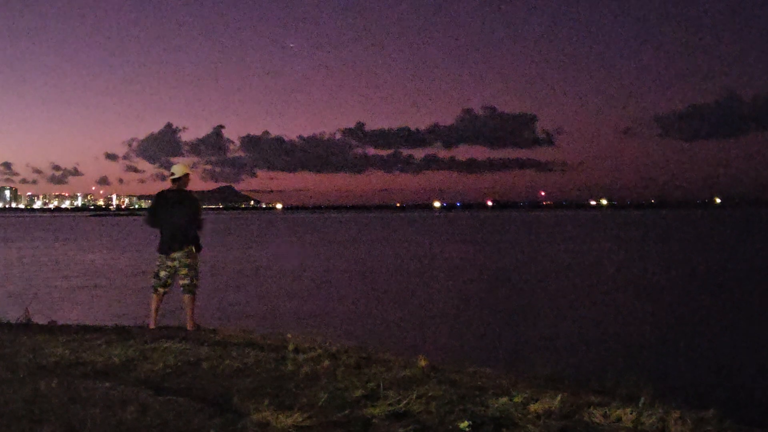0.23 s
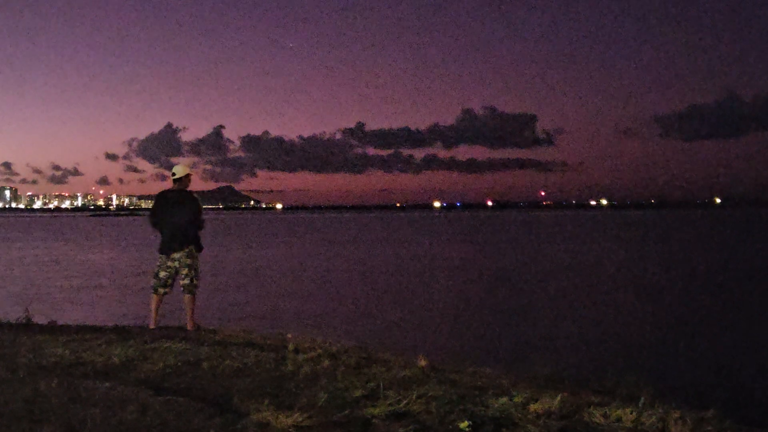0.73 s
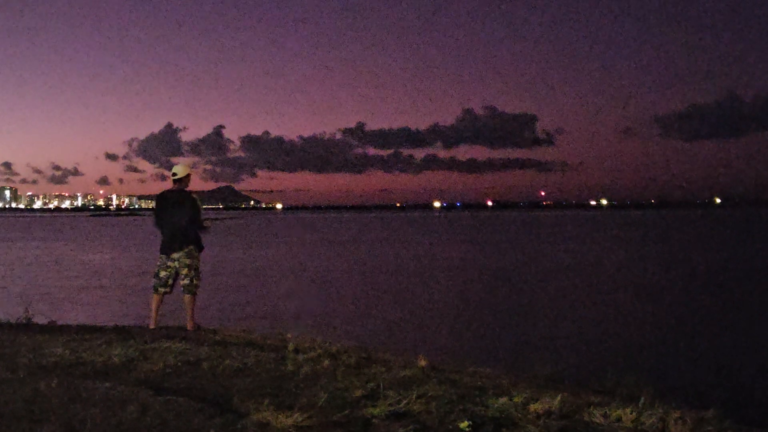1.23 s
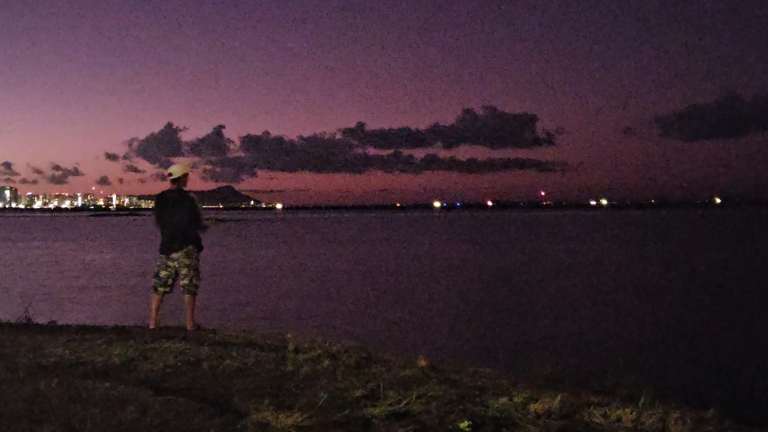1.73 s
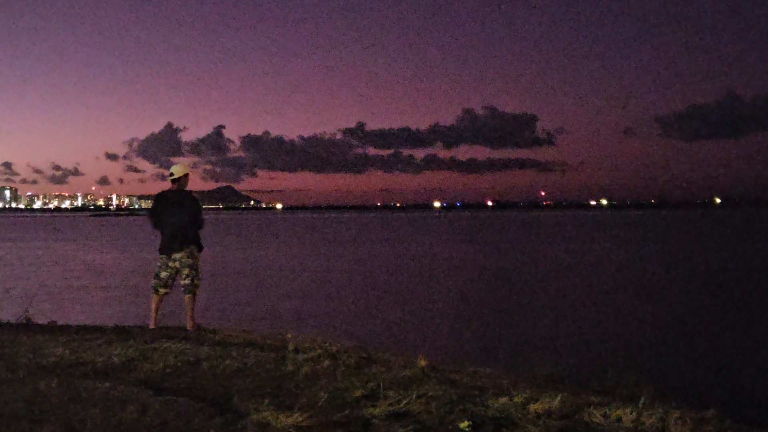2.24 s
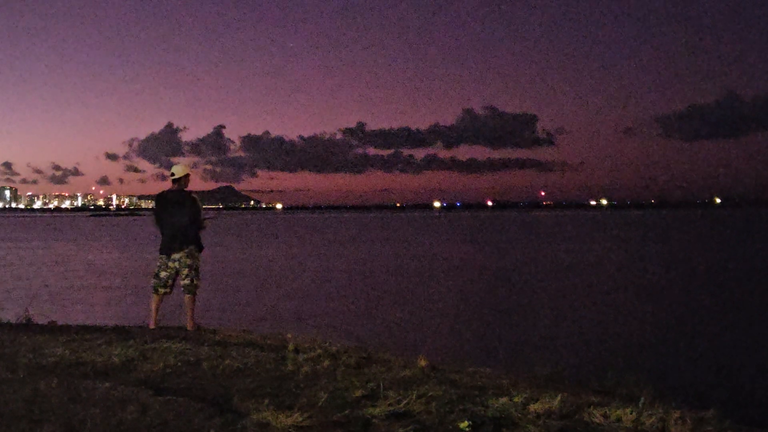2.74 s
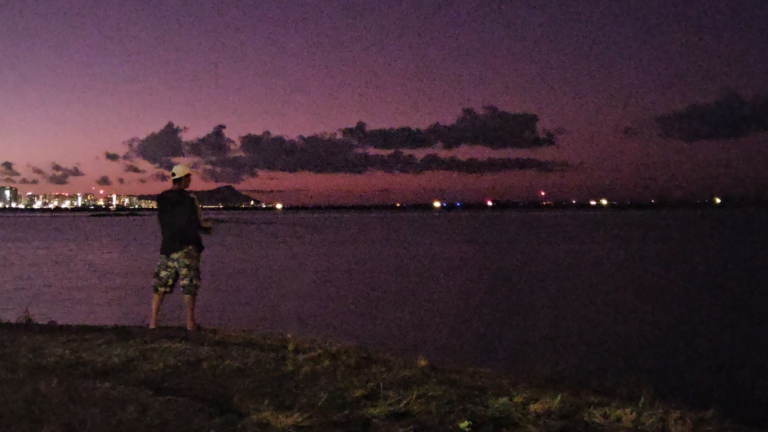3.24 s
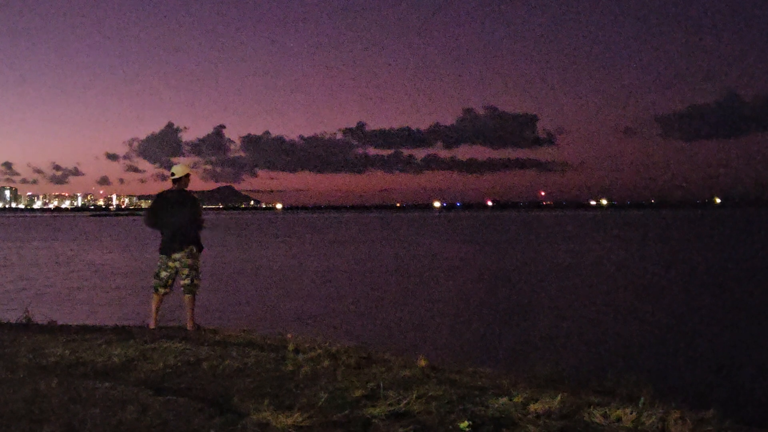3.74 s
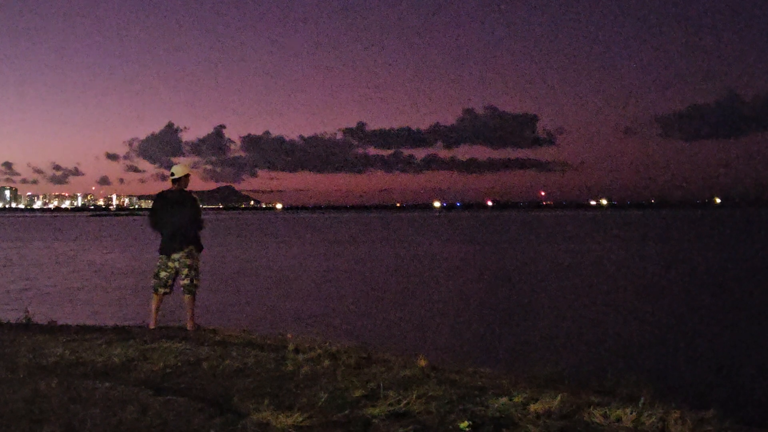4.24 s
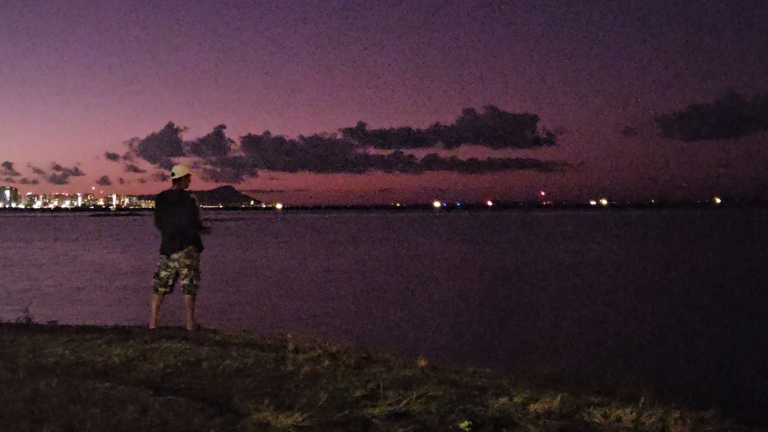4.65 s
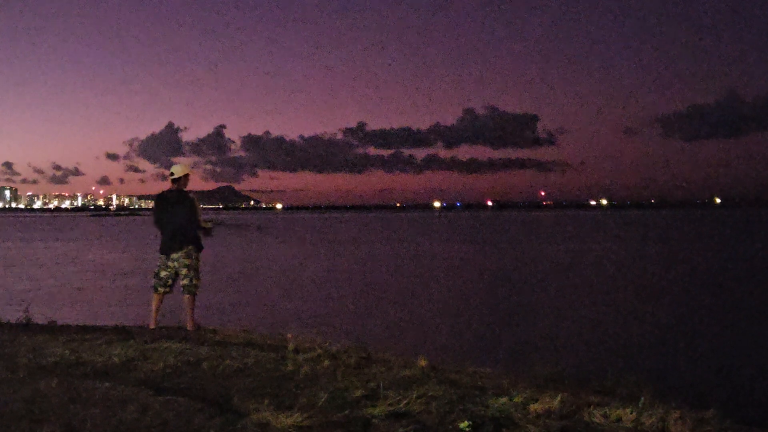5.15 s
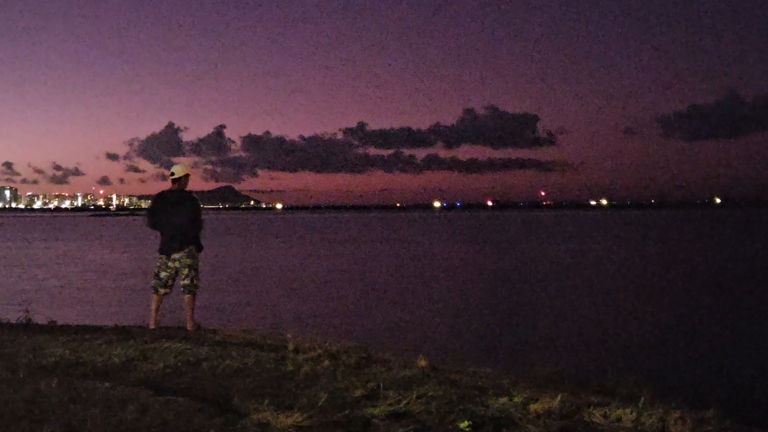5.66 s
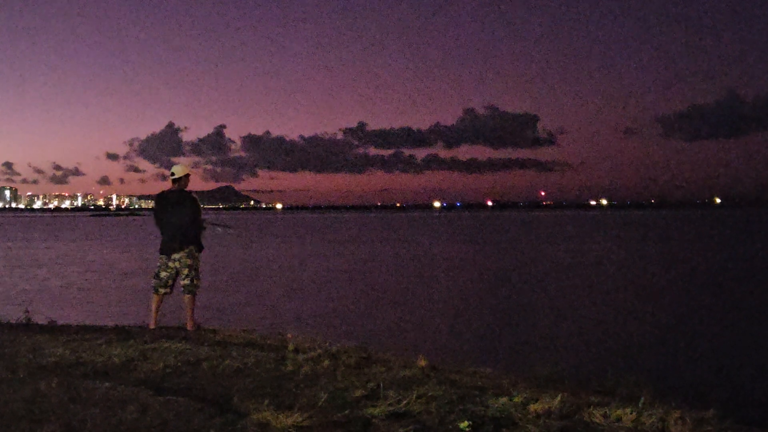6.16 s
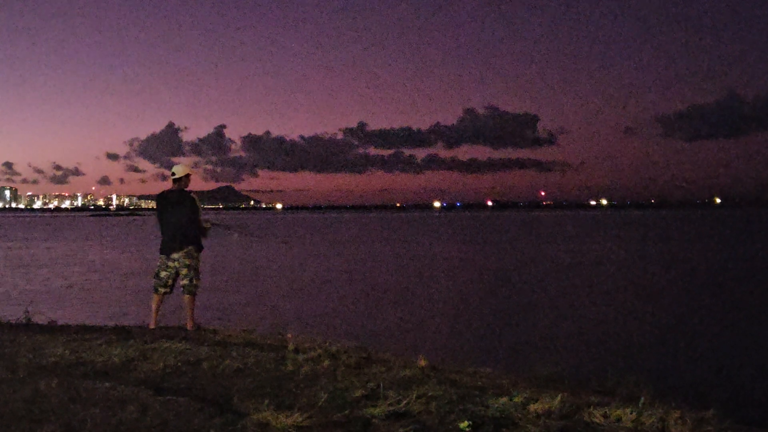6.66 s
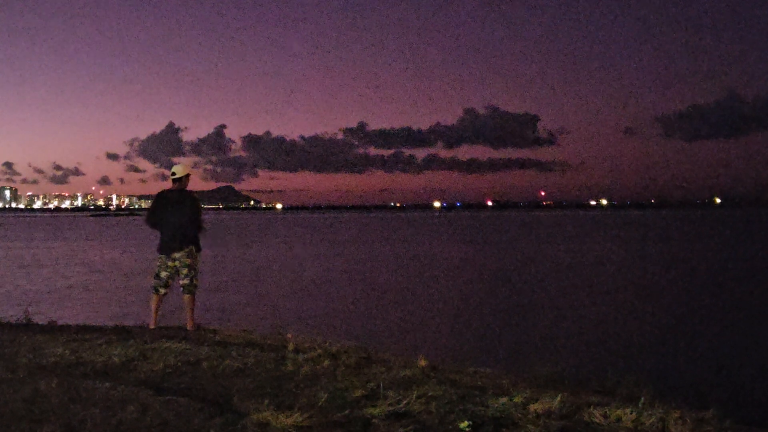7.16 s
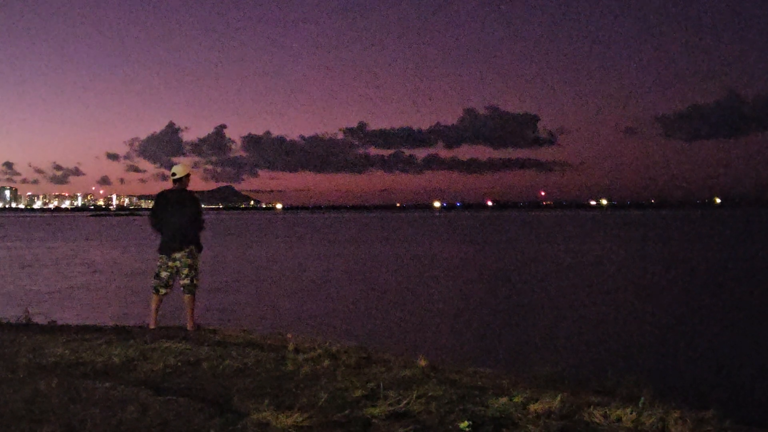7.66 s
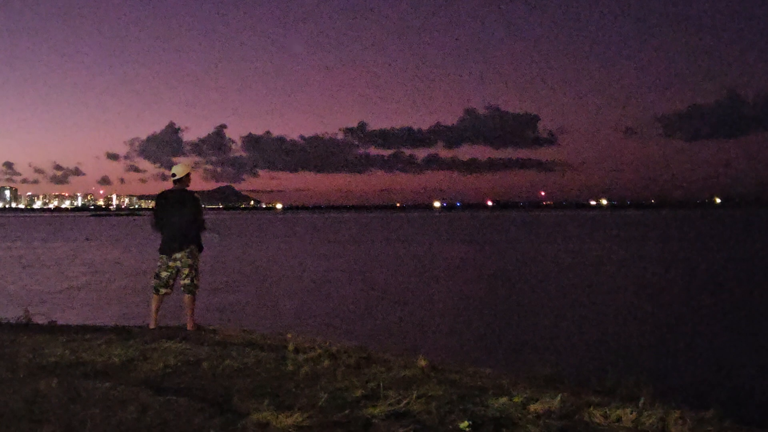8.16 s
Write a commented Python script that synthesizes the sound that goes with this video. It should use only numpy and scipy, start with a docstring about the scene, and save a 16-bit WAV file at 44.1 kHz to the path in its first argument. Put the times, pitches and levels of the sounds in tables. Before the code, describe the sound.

Outdoors on an open, quiet shore, little waves slap stones close by, with fizzing foam, popping bubbles and sharp drips. A low distant city rumble lies beneath. A jet airliner flies in: a faint roar grows from about three seconds, then surges in gusts, with a thin wavering fan whine sinking in pitch. By the end it is loud and nearly covers the water. Stereo handheld phone pickup, no room echo.

```python
"""A jet airliner flies low over a quiet shore: bands of shaped noise build its exhaust rumble and roar in gusts
and comb with a ground echo, while a wavering blade tone, the fan whine, sinks in pitch as the jet passes.
Bands of noise that follow the blade tone make the intake's rush. In front, wavelets slap, fizz and tick on
the stones: noise bursts, showers of tiny bubbles, ringing air pockets and drops.
A distant city rumbles below as wide, dark noise. A phone with two spaced ports hears it all."""
import sys
import numpy as np
from scipy import signal
from scipy.fft import rfft, irfft, next_fast_len
from scipy.io import wavfile
from scipy.ndimage import map_coordinates

SR = 44100
rng = np.random.default_rng(int(sys.argv[2]) if len(sys.argv) > 2 else 0)


def materialize(psi):
    """Save the field psi as 16-bit PCM at rate SR to the path in sys.argv[1].

    A 1-D psi becomes a single channel; in a 2-D psi each row is a channel.
    """
    bounded = np.clip(np.atleast_2d(psi).T, -1, 1)
    quanta = np.round(bounded * 32767).astype(np.int16)
    wavfile.write(sys.argv[1], SR, quanta)


N = 370881
TIME = np.arange(N) / SR  # s
SIZE = next_fast_len(N + 4096, real=True)  # filter length with spare room at the end
FREQ = np.maximum(np.arange(SIZE // 2 + 1) * SR / SIZE, 1)  # Hz

# the jet's pass before gusts and swells; noise levels are relative to its spectrum:
# [t/s, rumble level/dB, roar level/dB, hiss level/dB, fan whine level/dB]
JET_PASS = [(0, -23.5, -19, -26, -64), (1.2, -24, -18, -27.5, -63), (1.7, -24.5, -17.5, -24.5, -54),
            (2.9, -13.5, -15, -21.5, -58.5), (3.7, -11, -16.5, -18, -58.5), (4.2, -5.5, -7.5, -12.5, -53.5),
            (4.75, -6.5, -5, -10.5, -51), (5.3, -1.5, 2, -7, -49.5), (5.85, 1, -2, -5, -48),
            (6.45, 2, 1.5, -2.5, -46), (6.95, -2, 1.6, -3, -46.5), (7.5, 1.2, 2.5, -3, -48),
            (8.41, 1.5, 4, -3.5, -44.5)]
# spectrum of the jet noise: [f/Hz, density/dB per Hz]
JET_SPECTRUM = [(22, -57), (36, -43.5), (70, -39), (125, -41), (210, -50), (350, -57), (520, -57.5),
                (780, -62.5), (1000, -62.5), (1350, -62), (2000, -67.5), (2900, -71.5), (4500, -80.5),
                (5600, -90.5), (7000, -110), (10000, -129), (16000, -135)]
# gusts of turbulent air that focus the sound on the shore or bend it away, before each part takes its share:
# [t/s at the crest, half-width/s to 1/e, lift/dB]
GUSTS = [(4.58, 0.11, 1.5), (5.08, 0.056, -2.5), (5.36, 0.2, 5.5), (6.25, 0.14, 8.5), (7.0, 0.1, 2),
         (7.41, 0.06, 4), (7.99, 0.18, 6.5)]
# share of a gust's lift taken by each part of the jet noise: {part: share, no unit}
GUST_SHARE = {"rumble": 0.16, "roar": 0.49, "hiss": 0.92}
# jet sound scattered by eddies, arriving from all round: [f/Hz, level/dB relative to the direct sound]
SCATTER_COLOUR = [(100, -15), (950, -19), (2000, -11), (2800, -13), (4000, -8), (7000, 0)]
# ground echo of the jet: [t/s, lag/ms, strength/0-1]
GROUND_ECHO = [(0, 1.57, 0.25), (4.0, 1.15, 0.2), (5.2, 1.8, 0.04), (6.25, 1.64, 0.22), (6.65, 1.23, 0.31),
               (7.05, 1.585, 0.7), (8.41, 2.37, 0.39)]
# lag of the left port behind the right for the jet: [t/s, lag/ms]
JET_PORT_LAG = [(0, .555), (4.5, .54), (7.1, .522), (8.41, .495)]
# the fan whine swells and fades on its own: [t/s at the crest, half-width/s to 1/e, lift/dB]
FAN_SWELLS = [(1.05, 0.11, 5), (2.35, 0.13, -3.5), (2.9, 0.067, 6), (3.3, 0.092, 4.5), (3.88, 0.1, 6),
              (5.21, 0.048, 8), (5.36, 0.15, 7.5), (6.22, 0.089, 14), (6.5, 0.13, 4), (7.26, 0.11, 6),
              (7.94, 0.082, 8)]
# rushing bands of the engine intake, before its approach level: [multiple of blade tone, half-width/Hz, level/dB]
INTAKE_BANDS = [(1.45, 548, -69), (2.16, 200, -78.5)]
# the intake beams forward, so it is heard on the approach: [t/s, level/dB]
INTAKE_LEVEL = [(0, -8), (1.7, -17), (2.2, 3), (4.0, 1.5), (5.3, 7.5), (6.5, -9)]
# wavelets running over the stones: [t/s at the crest, level/dB, build-up time constant/s]
WAVES = [(.17, -3, 0.06), (.26, -11, 0.12), (.555, 0, 0.018), (.81, 1.5, 0.18), (.99, 1.5, 0.1),
         (1.98, -1, 0.08), (2.19, -12.5, 0.38), (3.67, -6, 0.12), (3.98, -6, 0.048), (4.22, 2.5, 0.18),
         (4.41, 4.5, 0.071), (4.51, 4, 0.0095), (5.31, -7.5, 0.14), (5.6, -12, .2), (5.91, -3, 0.14),
         (6.06, -4.5, 0.089), (7.12, -7.5, 0.13), (7.58, -2.5, 0.12), (7.95, -12, 0.22), (8.39, 1, 0.076)]
# spectrum of the foam's fizz, before the wash and the mix of its layers: [f/Hz, density/dB per Hz]
FIZZ_SPECTRUM = [(800, -92), (1600, -94), (3200, -89.5), (5200, -91), (6600, -103), (7300, -92),
                 (9300, -99), (11000, -108), (15000, -108)]
# wavelets slapping the bank: [t/s, level/dB relative to the slap spectrum, decay time constant/s]
SLAPS = [(.128, -5, 0.0077), (0.165, 5.5, 0.0085), (0.176, -3.5, 0.013), (.66, -9.5, 0.08),
         (.74, -7, 0.074), (.82, -10, 0.06), (.935, -4.5, 0.035), (1.852, -2, 0.031), (1.877, -1, 0.014),
         (1.899, 0, 0.014), (1.929, 3, 0.0068), (1.941, -2, 0.017), (1.962, 3.5, 0.013), (1.974, 4, 0.017),
         (1.997, 5, 0.01), (1.048, 6.5, 0.003), (4.149, -2.5, 0.061), (4.367, -1, 0.0084),
         (7.55, -1, 0.031)]
# spectrum of a slap's body: [f/Hz, density/dB per Hz]
SLAP_SPECTRUM = [(250, -63.5), (400, -74), (550, -69), (900, -87), (1700, -72), (3200, -84.5),
                 (5000, -85.5), (6600, -90.5), (8000, -91.5), (11000, -110), (15000, -113)]
# air pockets that the slaps trap and set ringing: [t/s, starting f/Hz, starting level/dB]
AIR_POCKETS = [(.165, 3030, -52), (.166, 520, -49), (.741, 3100, -49), (1.879, 3400, -47),
               (1.930, 3150, -42), (1.965, 2100, -44), (2.002, 1630, -39), (4.370, 3460, -37)]
# single drops on the stones, before the common drop gain and colour: [t/s, level/dB]
DROPS = [(0.1685, -52), (.9388, -45), (.950, -48), (0.9667, -43), (0.9832, -43), (1.0361, -49),
         (1.0491, -40), (1.0514, -43), (1.1113, -55), (1.8796, -50), (1.9753, -47), (3.652, -54),
         (3.656, -52), (3.7379, -53), (3.9604, -54), (4.1111, -48.5), (4.208, -46), (4.2994, -47),
         (4.3599, -49), (4.371, -49), (4.4054, -46), (4.4266, -44), (4.507, -57), (4.5115, -54),
         (6.0343, -55), (7.097, -52), (7.1933, -53), (7.571, -55), (8.048, -57)]
# colour of a drop: [f/Hz, gain/dB]
DROP_COLOUR = [(1500, -23), (4000, -5), (6500, 4), (7500, 2.5), (9500, -1), (11000, -5), (15000, -8.5)]
# distant city across the water: [f/Hz, density/dB per Hz]
CITY_SPECTRUM = [(22, -60), (40, -48), (90, -50.5), (170, -70), (250, -70), (360, -83.5), (520, -75),
                 (780, -81.5), (1050, -94), (1400, -93), (2000, -87.5), (2750, -96.5), (3400, -96.5),
                 (5400, -101), (7000, -113), (11000, -125), (15000, -129)]
# the two ports colour the sound differently: [f/Hz, left minus right/dB]
PORT_COLOUR = [(60, 1.0), (1000, .6), (2150, 1.3), (3200, -3.5), (3900, -2.8), (5200, -4.5), (7300, -8),
               (9300, -9.5), (10400, -5), (11300, 7), (13000, 0)]

FAN_HZ = 2274  # centre of the blade tone as heard when the jet is nearest
SPEED_M_S, NEAREST_M, NEAREST_S = 48, 269, 6.6  # flight path: speed, nearest distance and its moment
SOUND_M_S = 343
DRAIN_SHARE = 0.83  # a wavelet drains in this share of its build-up time
CALM_DB = -22.5  # the wash between wavelets
TOP_HZ = 15800  # the phone's upper limit


def exhaust(rumble_hz=260, hiss_hz=850, flutter_db=0.96, shimmer_db=0.3, ground_hz=1150):
    """Jet mixing noise in three ranges, unsteady in turbulent air; the moving ground echo combs it."""
    low = 1 / (1 + (FREQ / rumble_hz) ** 6)
    under_hiss = 1 / (1 + (FREQ / hiss_hz) ** 6)
    power_shares = {"rumble": low, "roar": np.abs(under_hiss - low), "hiss": 1 - under_hiss}
    flutter = walk(4.9)
    around = shape(diffuse(JET_SPECTRUM), gains(SCATTER_COLOUR))
    direct, scattered = 0, 0
    for k, (part, share) in enumerate(power_shares.items()):
        level_db = heard_db(part)
        band = shape(colour(white(), JET_SPECTRUM), np.sqrt(share))
        # eddies bend short waves most: no flutter in the rumble, half in the roar, all in the hiss
        unsteady_db = flutter_db * flutter * k / 2 + shimmer_db * walk(17)
        direct = direct + band * undb(level_db + unsteady_db)
        scattered = scattered + shape(around, np.sqrt(share)) * undb(level_db)
    # grass and stones return mainly the longer waves
    returned = shape(direct, 1 / (1 + (FREQ / ground_hz) ** 4))
    echo = delay(returned, curve(GROUND_ECHO)) * curve(GROUND_ECHO, axis=2)
    return arrive(direct + echo, curve(JET_PORT_LAG)) + scattered


def heard_db(part):
    """Level of one part of the jet noise: the approach, lifted or dipped by its share of each gust."""
    column = 1 + list(GUST_SHARE).index(part)
    return curve(JET_PASS, axis=column) + GUST_SHARE[part] * lift_db(GUSTS)


def lift_db(swells):
    """Bell-shaped swells and dips of level, added up in dB."""
    return sum(db * np.exp(-((TIME - s) / width) ** 2) for s, width, db in swells)


def fan(waver_hz=3, fade=0.34, skirt=0.47, skirt_hz=55, octave_db=-11.0, stray=0.11):
    """The blade tone wavers and fades along its path; it has a noisy skirt and a smeared octave."""
    phase = 2 * np.pi * np.cumsum(fan_pitch() + waver_hz * walk(6)) / SR
    fading = 1 + fade * (walk(17) + 1j * walk(12))
    # a longer path through the eddies scatters more of the tone into its skirt
    path = np.hypot(SPEED_M_S * (TIME - NEAREST_S), NEAREST_M) / NEAREST_M
    haze = skirt * path ** 2 * (walk(skirt_hz) + 1j * walk(skirt_hz))
    # the air absorbs the octave until the jet is near
    octave_gain = undb(octave_db + np.minimum(heard_db("hiss"), 0) / 2)
    octave = octave_gain * (walk(170) + 1j * walk(170))
    tone = np.real((fading + haze) * np.exp(1j * phase) + octave * np.exp(2j * phase))
    whine = arrive(tone, curve(JET_PORT_LAG)) + stray * rush(0.93, skirt_hz)
    return whine * undb(curve(JET_PASS, axis=4) + lift_db(FAN_SWELLS))


def fan_pitch():
    """Doppler shift: the blade tone (Hz) is high while the jet approaches and sinks as it passes."""
    along_m = SPEED_M_S * (TIME - NEAREST_S)
    receding_m_s = SPEED_M_S * along_m / np.hypot(along_m, NEAREST_M)
    return FAN_HZ / (1 + receding_m_s / SOUND_M_S)


def intake():
    """Air rushing through the blades sings in noise bands at multiples of the blade tone."""
    bands = sum(undb(db) * rush(multiple, width) for multiple, width, db in INTAKE_BANDS)
    return bands * undb(curve(INTAKE_LEVEL))


def rush(multiple, width_hz):
    """A band of noise that follows a multiple of the blade tone, unrelated at the two ports."""
    carrier = np.exp(2j * np.pi * multiple * np.cumsum(fan_pitch()) / SR)
    return np.array([np.real((walk(width_hz) + 1j * walk(width_hz)) * carrier) for _ in range(2)])


def wavelets(slap_lag_ms=0.3, foam_lag_ms=.12, wide=0.81, near=0.56, pops=0.35):
    """Small waves slap the bank, fizz along the stones and shed drops."""
    wash = surge() * undb(1.5 * walk(30) + 1.6 * walk(220))
    # fine foam close by, with sparser bubbles popping in it
    bubbles = near * spatter(2000, 4.1) + pops * spatter(55, 3.0)
    foam = colour(bubbles * wash, FIZZ_SPECTRUM)
    wide_bubbles = np.array([spatter(4000, 3.2) for _ in range(2)])
    foam_wide = colour(wide_bubbles * wash, FIZZ_SPECTRUM)
    bank = arrive(slaps() + pockets(), slap_lag_ms)
    return bank + arrive(foam + drops(), foam_lag_ms) + wide * foam_wide


def surge():
    """Strength of the wash: each wavelet builds to its crest and drains away; their powers add."""
    power = undb(CALM_DB) ** 2
    for s, db, build_s in WAVES:
        from_crest = np.maximum(s - TIME, (TIME - s) / DRAIN_SHARE)
        power = power + (undb(db) * np.exp(-from_crest / build_s)) ** 2
    return np.sqrt(power)


def spatter(rate, spread_db):
    """Tiny bubbles bursting, about rate a second, mostly faint and a few strong; unit power."""
    sizes = undb(spread_db * np.minimum(rng.exponential(size=N), 5))
    x = (rng.random(N) < rate / SR) * sizes * np.sign(white())
    return x / x.std()


def slaps(rise_s=0.0017):
    """Water striking the bank: dense spatter that rises sharply and dies away with each blow."""
    blows = np.zeros(N)
    for s, db, decay_s in SLAPS:
        age = TIME[TIME > s] - s
        blows[TIME > s] += undb(db) * (1 - np.exp(-age / rise_s)) * np.exp(-age / decay_s)
    return colour(spatter(9000, 1.5) * blows, SLAP_SPECTRUM)


def pockets(cycles=9, rise=0.028):
    """Each trapped air pocket rings with a decay of a few cycles, rising a little in pitch."""
    out = np.zeros(N)
    for s, hz, db in AIR_POCKETS:
        ringing = slice(*np.searchsorted(TIME, [s, s + 5 * cycles / hz]))
        turns = (TIME[ringing] - s) * hz
        tone = np.sin(2 * np.pi * turns * (1 + rise * turns / cycles))
        out[ringing] += undb(db) * np.exp(-turns / cycles) * tone
    return out


def drops(drop_db=5.5, ring_s=0.0012, scatter_s=0.016, droplet_db=-13,
          ping_hz=7800, ping=0.51, click=0.63, count=2):
    """Each drop ticks on a stone, pings at a pitch of its own and throws a few weaker droplets."""
    ticks, noise = np.zeros(N), white()
    for (s, db), chance in zip(DROPS, rng.random((len(DROPS), count + 1))):
        hz = ping_hz * 2 ** ((chance[0] - .5) / 2)  # within a quarter octave either way
        # later droplets are weaker
        droplets = [(s + scatter_s * c, droplet_db * (.5 + c)) for c in chance[1:]]
        for start, size_db in [(s, 0)] + droplets:
            ringing = slice(*np.searchsorted(TIME, [start, start + 10 * ring_s]))
            age = TIME[ringing] - start
            strike = click * noise[ringing] + ping * np.sin(2 * np.pi * hz * age)
            ticks[ringing] += undb(db + drop_db + size_db) * np.exp(-age / ring_s) * strike
    return shape(ticks, gains(DROP_COLOUR))


def city(swell_db=0.74):
    """Far traffic and airfield rumble: noise from all round, gently swelling."""
    return diffuse(CITY_SPECTRUM) * undb(swell_db * walk(3.7))


def diffuse(spectrum, spacing_ms=0.95):
    """Noise from all round: most alike at both ports for long waves."""
    alike = np.sinc(2 * FREQ * spacing_ms / 1000)
    mid = shape(white(), np.sqrt((1 + alike) / 2))
    side = shape(white(), np.sqrt((1 - alike) / 2))
    return colour(np.array([mid + side, mid - side]), spectrum)


def arrive(x, lag_ms):
    """Sound from the right reaches the left port later; returns left and right."""
    return np.array([delay(x, lag_ms), x])


def delay(x, ms):
    """Delay by a steady or moving time."""
    return map_coordinates(x, [np.arange(N) - ms * SR / 1000], order=3, mode="mirror")


def white():
    """White noise of unit power."""
    return rng.standard_normal(N)


def walk(rate):
    """Smooth random drift of unit spread that changes about rate times a second."""
    x = shape(white(), 1 / (1 + (FREQ / rate) ** 4))
    return x / x.std()


def colour(x, spectrum):
    """Give a white signal of unit power a spectrum in dB per Hz, shared between two ports."""
    return shape(x, gains(spectrum) * np.sqrt(SR) / 2)


def shape(x, response):
    """Filter by a frequency response."""
    return irfft(rfft(x, SIZE) * response, SIZE)[..., :N]


def gains(points):
    """(Hz, dB) points as a gain at every frequency."""
    hz, db = np.transpose(points)
    return undb(np.interp(np.log(FREQ), np.log(hz), db))


def curve(table, axis=1):
    """One column of a timed table at every sample."""
    rows = np.array(table)
    return np.interp(TIME, rows[:, 0], rows[:, axis])


def undb(db):
    """Decibels to gain."""
    return 10 ** (np.asarray(db) / 20)


def scene():
    """The jet above, the water in front, the city beyond."""
    return exhaust() + fan() + intake() + wavelets() + city()


def record(dry, low_cut_hz=22, vent_hz=11, body_hz=2650, body_width_hz=900, body_turn=0.24):
    """Each port adds its colour; the phone cuts the deepest bass and the top."""
    tilt = np.sqrt(gains(PORT_COLOUR))
    # the right capsule leaks more bass, which turns its phase
    vent = FREQ / (FREQ - 1j * vent_hz)
    # waves about as long as the phone bend round its body and reach the left port later still (radians)
    turn = body_turn * np.exp(-((FREQ - body_hz) / body_width_hz) ** 2)
    body = np.exp(-1j * turn)
    # the tilt leaves the summed power of both ports unchanged
    ports = np.array([tilt * body, vent / tilt]) / np.sqrt((tilt ** 2 + tilt ** -2) / 2)
    heard = shape(dry, ports / np.sqrt(1 + (low_cut_hz / FREQ) ** 8))
    fade_in = np.minimum(TIME / .008, 1) ** 2
    top_cut = signal.ellip(10, .2, 80, TOP_HZ, fs=SR, output="sos")
    return signal.sosfilt(top_cut, heard * fade_in)


dry = scene()
out = record(dry)
materialize(out)
```